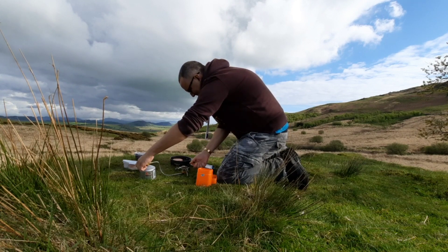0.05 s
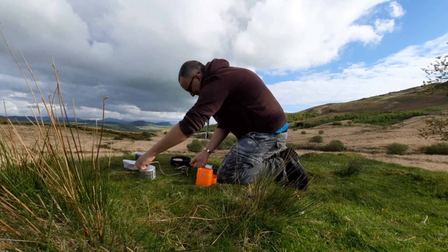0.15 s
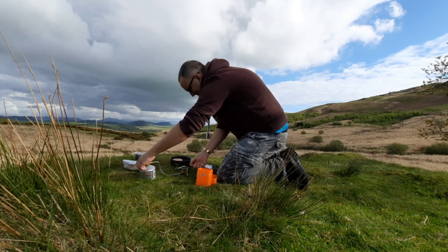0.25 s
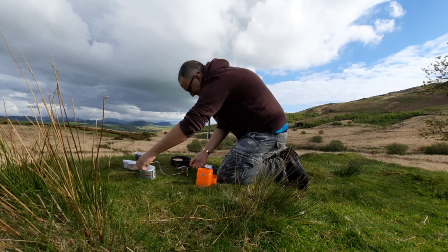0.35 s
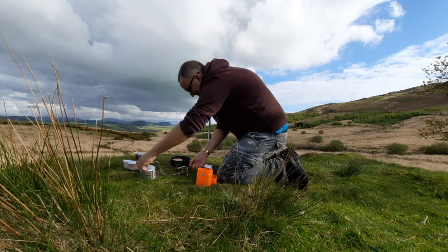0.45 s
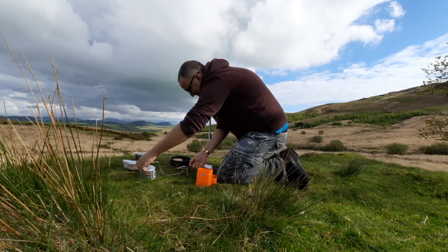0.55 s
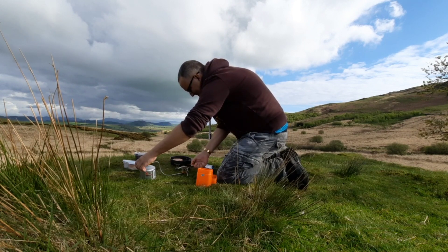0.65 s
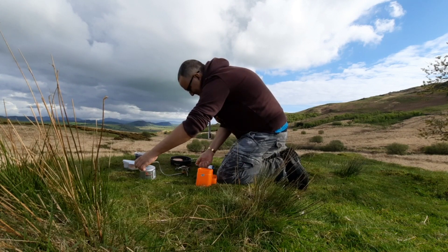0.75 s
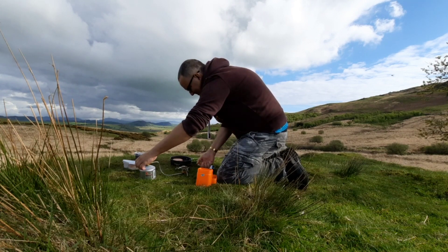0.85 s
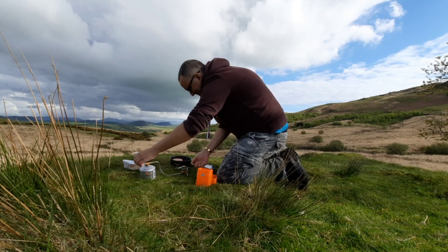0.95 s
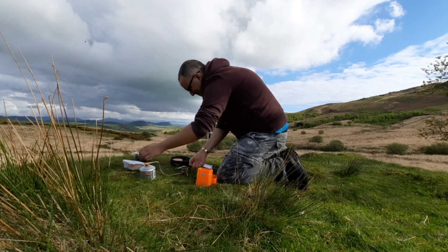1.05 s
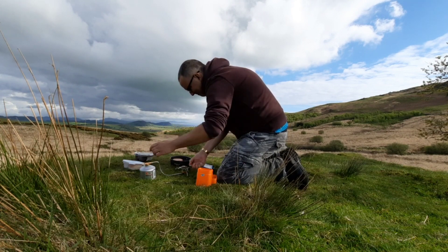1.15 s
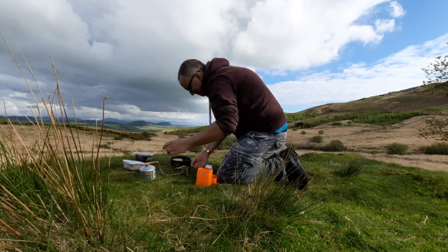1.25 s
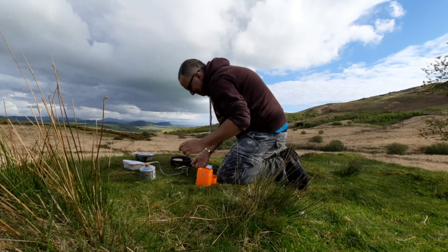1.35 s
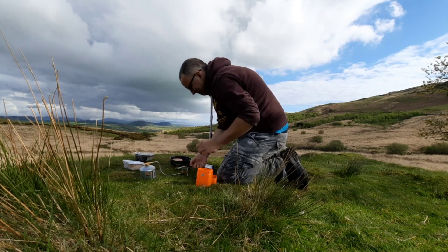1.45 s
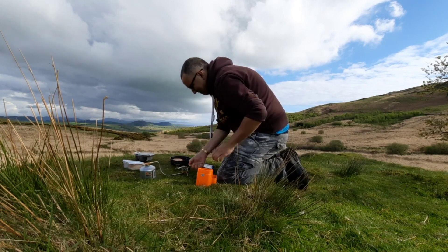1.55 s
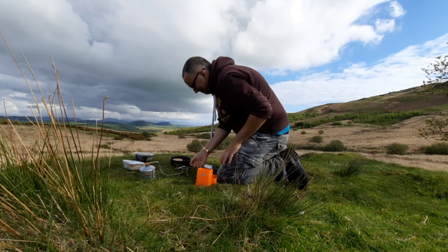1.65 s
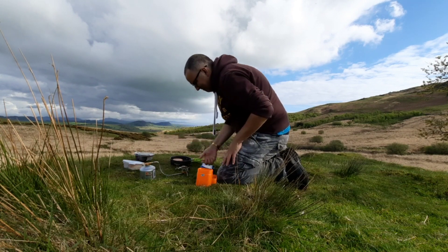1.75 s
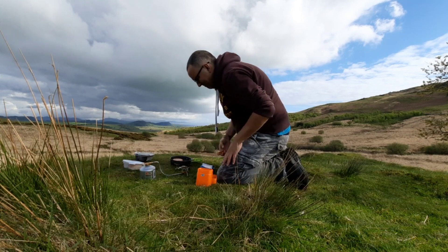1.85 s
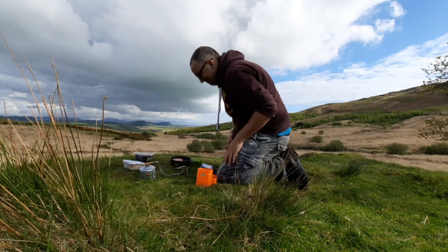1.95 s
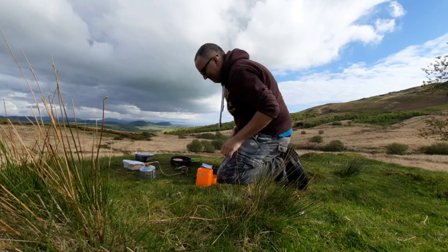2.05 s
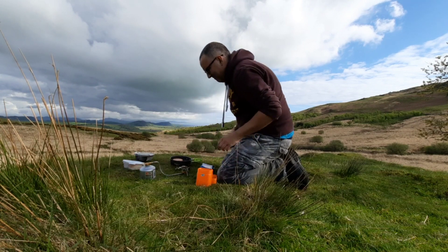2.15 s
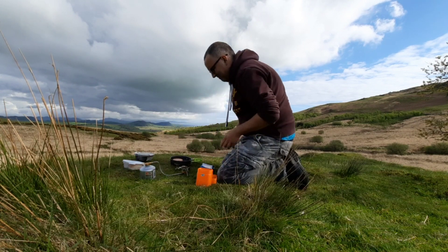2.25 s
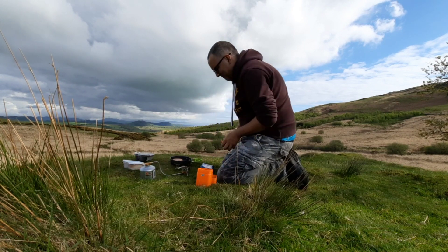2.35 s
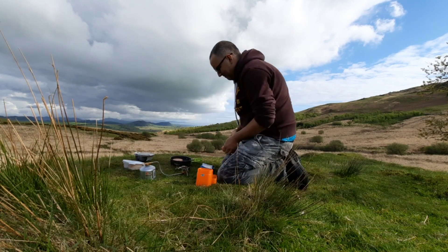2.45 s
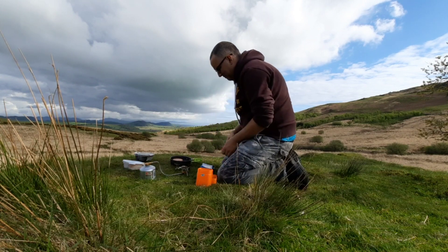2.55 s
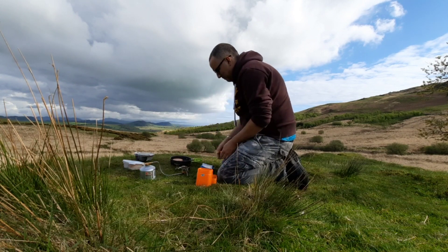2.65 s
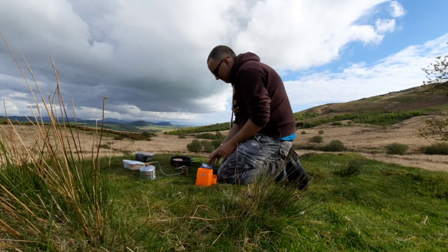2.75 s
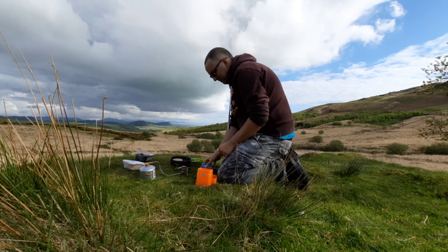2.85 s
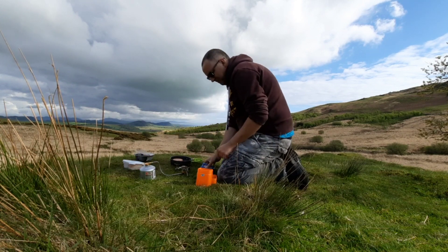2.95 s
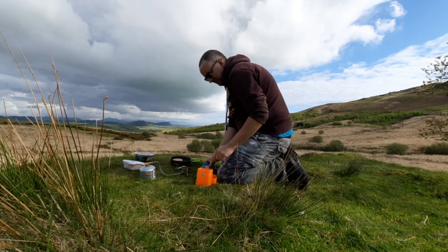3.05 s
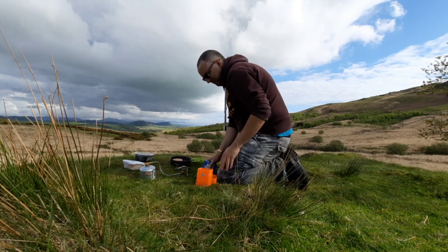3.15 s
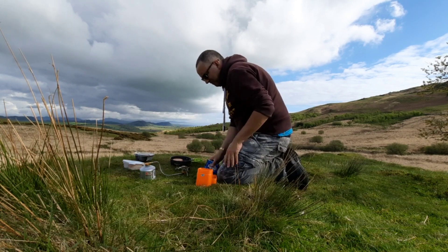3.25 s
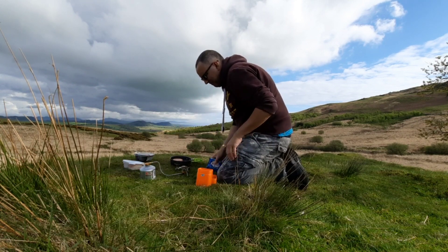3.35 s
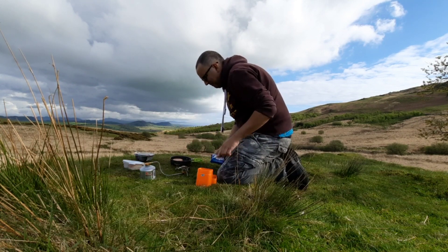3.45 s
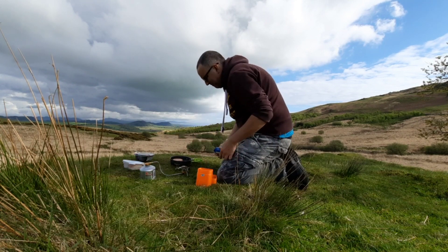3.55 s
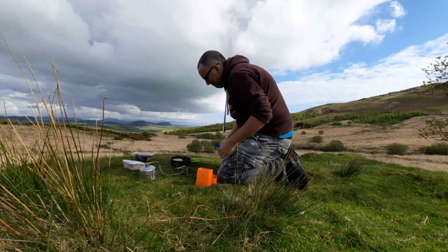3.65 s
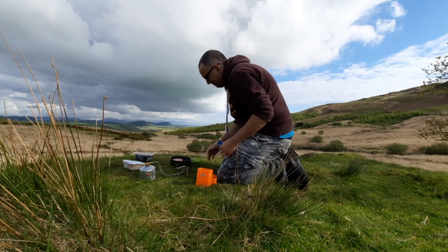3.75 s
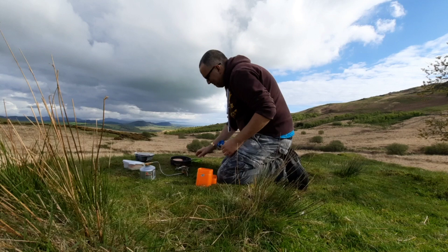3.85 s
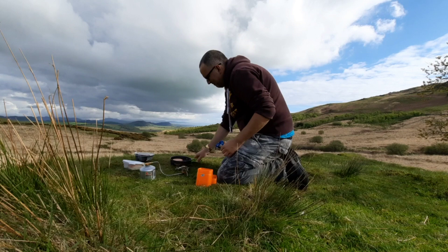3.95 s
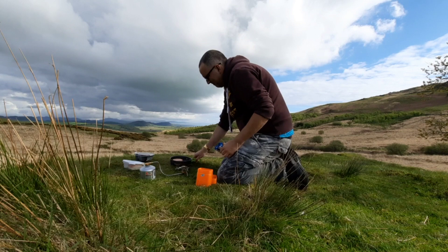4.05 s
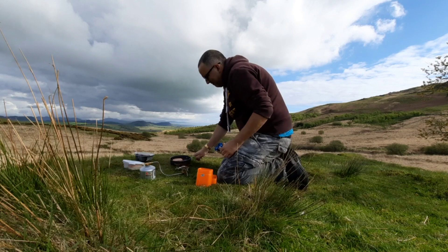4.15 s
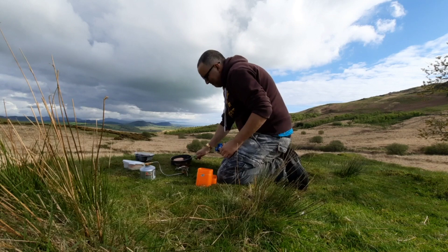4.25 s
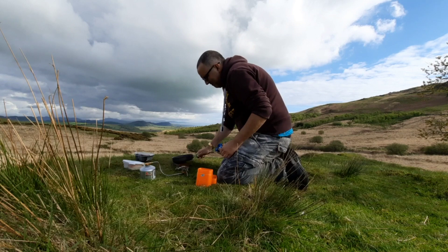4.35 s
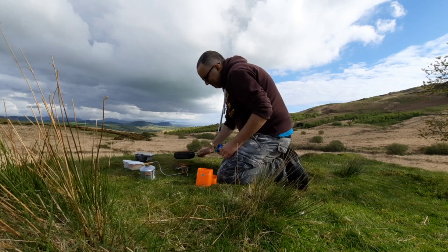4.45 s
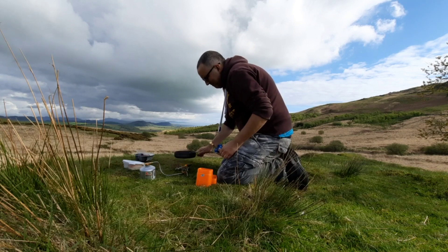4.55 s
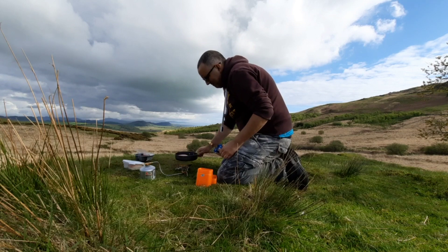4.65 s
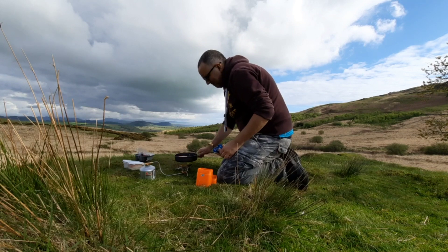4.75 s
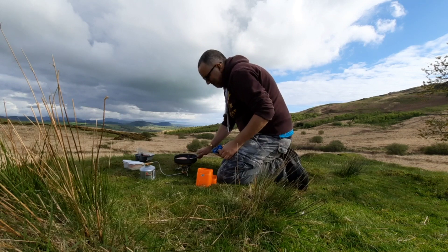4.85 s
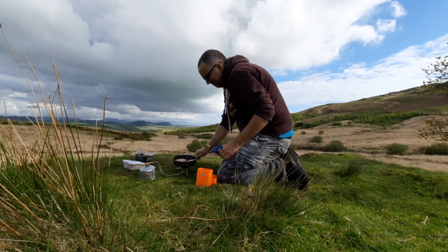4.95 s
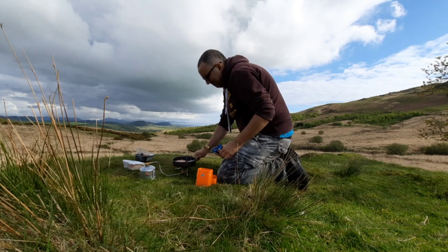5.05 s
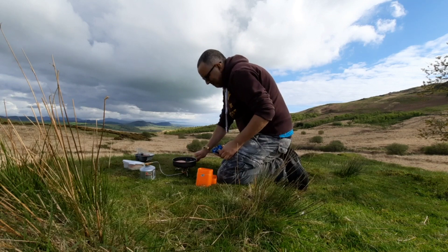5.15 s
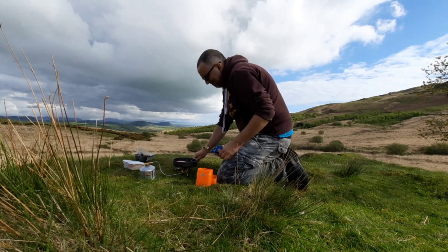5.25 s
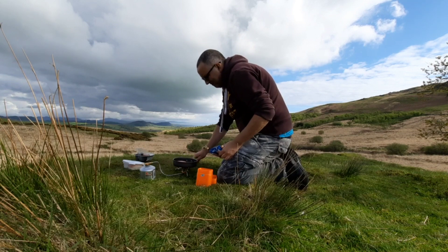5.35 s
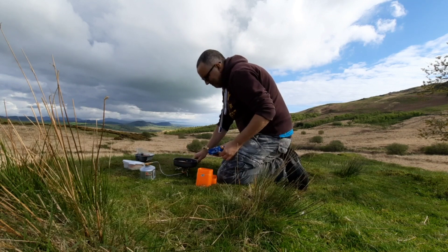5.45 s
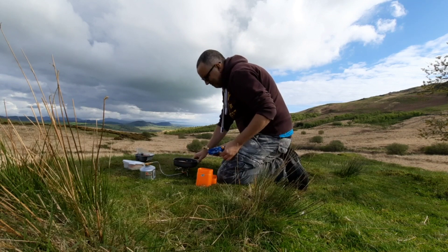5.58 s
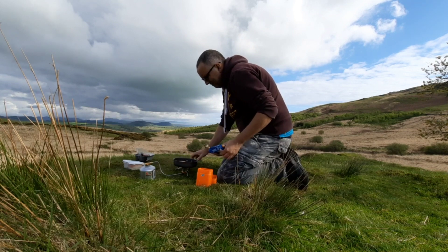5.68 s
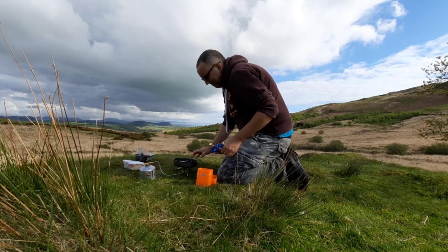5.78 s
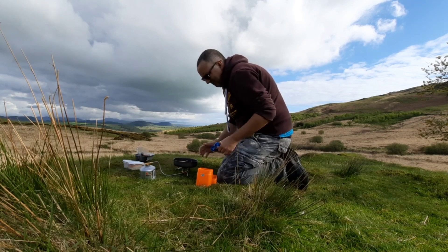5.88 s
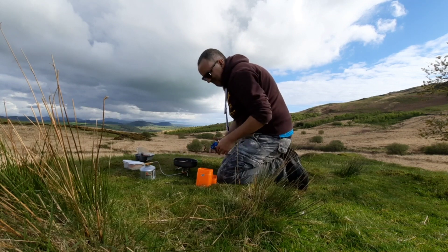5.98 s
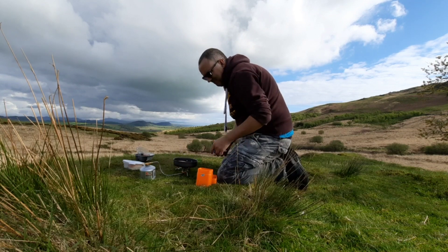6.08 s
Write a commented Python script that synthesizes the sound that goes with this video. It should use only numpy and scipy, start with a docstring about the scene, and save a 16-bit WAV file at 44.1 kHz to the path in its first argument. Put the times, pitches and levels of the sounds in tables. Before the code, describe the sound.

Faint hissing gas, three cracking clicks, a soft fluttering burner roar takes hold, with ticks, fabric rustle and light metal clatter on open grass.

```python
"""A camping gas stove on open grass, to the left of a small camera with two microphone ports, in a light wind.
First gas hisses from the jet (noise in broad resonances) amid swells of rustling, mostly hands, and ticks, knocks.
The igniter snaps three times (short ringing cracks). Just after the third snap the flame catches and roars low,
made of fluttering bands of noise, while hiss and handling go on and the pan clatters (struck modes). Low rumble
(wind, later probably the flame too) is at both ports; the right hears the stove a little later and shaded."""
import sys
import numpy as np
from scipy import signal
from scipy.fft import rfft, irfft, next_fast_len
from scipy.io import wavfile
from scipy.ndimage import uniform_filter1d, map_coordinates

SR = 44100
rng = np.random.default_rng(int(sys.argv[2]) if len(sys.argv) > 2 else 0)


def volts_from_db(level):
    """Convert decibel levels to linear amplitude ratios."""
    exponent = np.asarray(level, float) / 20
    return 10 ** exponent


def materialize(psi):
    """Save the field psi as 16-bit PCM at rate SR to the path in sys.argv[1].

    A 1-D psi becomes a single channel; in a 2-D psi each row is a channel.
    """
    bounded = np.clip(np.atleast_2d(psi).T, -1, 1)
    quanta = np.round(bounded * 32767).astype(np.int16)
    wavfile.write(sys.argv[1], SR, quanta)


N = 269877  # length in samples


def unit(x):
    """Scale so that the mean of the channels has rms 1."""
    return x / np.sqrt(np.mean(np.atleast_2d(x).mean(0) ** 2) + 1e-20)


def along(points, hz):
    """Read a curve of (hz, value) points on a logarithmic pitch axis."""
    point_hz, value = np.transpose(points)
    return np.interp(np.log(hz + 1), np.log(point_hz + 1), value)


def curves(rows):
    """One value per sample for each column after the time."""
    time_s, *columns = np.transpose(rows)
    return [np.interp(np.arange(N) / SR, time_s, column) for column in columns]


def wobble(rate):
    """A smooth random curve through 'rate' random points a second."""
    knots = rng.standard_normal(int(N * rate / SR) + 4)
    return map_coordinates(knots, [np.arange(N) * rate / SR])


def filtered(x, response):
    """Filter x by a response given as a function of frequency."""
    m = next_fast_len(N + SR // 4)
    spectrum = rfft(x, m) * response(np.fft.rfftfreq(m, 1 / SR))
    return irfft(spectrum, m)[..., :N]


def peaks(table):
    """Filter of several resonances (centre_hz, width_hz, level_db) whose powers add."""
    return lambda f: np.sqrt(sum(volts_from_db(2 * db) / (1 + (2 * (f - c) / w) ** 2) ** 2 for c, w, db in table))


def colour(points):
    """Filter that follows (hz, level_db) points."""
    return lambda f: volts_from_db(along(points, f))


def ports(x):
    """The left port hears x[0] as it is; the right hears x[1] later and shaded."""
    # shading of the right port: hz [Hz], level_db [dB]
    shade = [(100, -1), (700, -3.5), (2300, -4.5), (4000, -13.5), (5200, -7), (6600, -2.5), (8500, -5),
             (11000, -10), (13500, -9), (15500, -3.5)]
    lag_s = .000083
    right = lambda f: volts_from_db(along(shade, f)) * np.exp(-2j * np.pi * f * lag_s)
    return np.array([x[0], filtered(x[1], right)])


def rush(gain, apart, patchy_db):
    """Patchy noise from the stove's side; 'apart' sets how much extra noise the right port has."""
    z = signal.stft(rng.standard_normal((2, N)), nperseg=512)[2]
    # random louder and softer patches, smoothed over pitch and then over time
    field = uniform_filter1d(rng.standard_normal(z.shape[1:]), size=5, axis=0)
    field = uniform_filter1d(field, size=10, axis=1)
    patchy = z * volts_from_db(patchy_db * field / field.std())
    shared, extra = signal.istft(patchy, nperseg=512)[1][:, :N]
    return unit(ports(filtered(np.array([shared, shared + apart * extra]), gain)))


def outdoors():
    """Low rumble swells differently at each port; the far murmur of the air is nearly the same at both."""
    # low rumble at the ports, wind and, after lighting, probably the flame too: time_s [s], level_db [dB]
    rumble_levels = [(0.0, -78), (0.27, -62), (0.32, -65.5), (0.83, -73.5), (0.92, -53.5), (1.02, -72),
                     (1.12, -56.5), (1.58, -74), (1.7, -49), (1.89, -63), (3.19, -46), (3.24, -66),
                     (3.37, -51), (4.67, -51), (4.69, -41), (4.98, -59), (5.01, -39), (5.28, -65),
                     (5.59, -51), (5.74, -71), (6.1, -42.5), (6.12, -56)]
    # tone of the low rumble: hz [Hz], level_db [dB, relative]
    buffet = [(13, -23), (22, -15), (36, -12), (54, -2), (67, 1), (140, -7), (180, -26), (310, -120)]
    # tone of the far murmur: hz [Hz], level_db [dB, relative]
    distant = [(88, -42), (150, -19), (252, -17), (340, -4.5), (459, -11), (515, -13), (750, -17),
               (1500, -31), (1950, -74), (3300, -120)]
    lumps = volts_from_db(3.9 * np.array([wobble(48), wobble(5.7)]) + 4.2 * wobble(9))
    rumble = unit(lumps * filtered(rng.standard_normal((2, N)), colour(buffet)))
    rumble = rumble * volts_from_db([[-1.2], [1.2]])  # left a little down, right a little up
    air_db = -70 + 1.5 * wobble(4)
    shared, left, right = filtered(rng.standard_normal((3, N)), colour(distant))
    air = unit(np.array([shared + 0.64 * left, shared + 0.53 * right]))
    return volts_from_db(curves(rumble_levels)[0]) * rumble + volts_from_db(air_db) * air


def strokes():
    """Loudness of rustle and crackle: each stroke swells and fades; a faint stir rustles on."""
    # swells of rustling noise, mostly hands; the one at 1.943 s is probably the flame's breath:
    # start_s [s], length_s [s], level_db [dB], crackle_db [dB over the rustle]
    swells = [(-.2, 1.7, -75.5, -20), (.62, 0.19, -91, -15), (1.086, 0.16, -68, -15),
              (1.587, 0.11, -69, -15), (1.943, 0.52, -64, -20), (2.86, 0.19, -64.5, -4),
              (2.985, 0.49, -65.5, -1.5), (3.602, 0.21, -66, 5), (4.014, 0.23, -73, -14),
              (4.672, 0.17, -62.5, -22), (4.973, 0.27, -64, -5)]
    stir_db = -83.5
    start_s, length_s, level_db, crackle_db = np.transpose(swells)[:, :, None]
    progress = np.clip((np.arange(N) / SR - start_s) / length_s, 0, 1)
    swell = np.sin(np.pi * progress) ** .6
    soft = volts_from_db(stir_db) + np.sum(volts_from_db(level_db) * swell, axis=0)
    crisp = np.sum(volts_from_db(level_db + crackle_db) * swell, axis=0)
    return soft, crisp


def crackle():
    """Sparse random crackles, as of creasing fabric: short noise bursts, mostly small with a few large ones."""
    when, size = rng.random((2, N))
    spikes = (when < 140 / SR) * (size + 0.0091) ** -.55  # about 140 a second
    decay = volts_from_db(-60 * np.arange(SR // 100) / SR / 0.0064)  # falls 60 dB in 6.4 ms
    bursts = np.convolve(spikes, decay)[:N] * rng.standard_normal(N)
    bursts = filtered(bursts, lambda f: 1 / (1 + (1800 / (f + 1)) ** 4) / (1 + f / 9000))
    return unit(ports([bursts, bursts]))


def rustle():
    """Swells of rustling noise, mostly from fabric under the hands: a soft rush with crackles."""
    # tone of the rustle: hz [Hz], level_db [dB, relative]
    rustle_tone = [(1300, -13.5), (1700, -3.5), (2000, -4.5), (2500, 0.5), (3300, -0.5), (4200, -5.5),
                   (6000, -4), (14000, -9)]
    soft, crisp = strokes()
    rushing = volts_from_db(1.8 * wobble(30)) * rush(colour(rustle_tone), apart=0.44, patchy_db=1.0)
    return soft * rushing + crisp * crackle()


def blows(rows, modes, scrape_db):
    """Each blow rings the slightly rough modes near its centre pitch, over a short scrape."""
    out, t = np.zeros(N + SR), np.arange(SR // 10) / SR
    mode_hz, mode_db, t60_s = np.transpose(modes)[:, :, None]
    draws = rng.standard_normal((len(rows), len(modes) + 1, len(t)))
    for (start_s, level_db, centre_hz, reach), (noise, *drift) in zip(rows, draws):
        # modes far from the centre, in octaves, ring less
        nearness = np.exp(-.5 * (np.log2(mode_hz / centre_hz) / reach) ** 2)
        share = volts_from_db(mode_db + 2 * noise[-len(modes):, None]) * nearness
        share = share / np.linalg.norm(share)
        phase = 2 * np.pi * mode_hz * t + .09 * np.cumsum(drift, axis=1)  # drift roughens the pitch
        ring = np.sum(share * volts_from_db(-60 * t / t60_s) * np.sin(phase), axis=0)
        band_hz = centre_hz * 2 ** np.clip([-reach, reach], -1.5, 1.5)
        dull = signal.butter(2, band_hz, "band", fs=SR, output="sos")
        scrape = 1.1 * volts_from_db(-60 * t / .05) * signal.sosfilt(dull, noise)
        scrape = scrape + 0.18 * volts_from_db(-60 * t / 0.0052) * noise  # brief bright start
        onset = 1 - np.exp(-t / 0.00096)
        blow = onset * (volts_from_db(scrape_db) * scrape + 0.51 * ring)
        out[round(start_s * SR):][:len(t)] += volts_from_db(level_db) * blow
    return out[:N]


def handling():
    """Ticks are noise bursts of a few ms; kit and pan ring when struck; bumps are short low tones."""
    # crisp ticks of fabric and kit: start_s [s], level_db [dB], middle_db [dB, middle range over bright]
    ticks = [(1.7363, -43, -12), (2.4168, -42, -11), (2.7196, -40, -17), (2.949, -43, 0), (3.0427, -46, -4),
             (3.0906, -43.5, 0), (3.1277, -41, -1.5), (3.1552, -43, -6), (3.1154, -53, 6),
             (3.141, -48.5, 3), (3.1633, -48, 6), (3.1733, -47, 5), (3.2215, -51, 4), (3.326, -53, -4),
             (3.3414, -53, 4), (3.6292, -46, -4), (3.6457, -47, 2), (3.662, -44.5, 3), (3.676, -51.5, -1),
             (3.7253, -48, 9.5), (3.7456, -48.5, 10), (3.7563, -42, 5), (3.7738, -52, -12),
             (4.0646, -39, -13), (4.34, -45, -9), (4.9884, -32.5, -9.5), (5.084, -40.5, -2),
             (6.0466, -34.5, -7), (6.0585, -44, 0)]
    # soft low bumps: start_s [s], level_db [dB], pitch_hz [Hz], length_s [s]
    bumps = [(0.28, -45, 111, 0.014), (0.881, -44.5, 61.5, 0.073), (1.099, -31, 150, 0.032),
             (1.134, -41, 149, 0.024), (1.161, -45, 133, 0.0095), (1.213, -47, 79, 0.032),
             (4.675, -21.5, 135, 0.022)]
    # dull knocks of the kit: start_s [s], level_db [dB], centre_hz [Hz], reach [octaves that ring]
    knocks = [(.851, -57, 2000, 0.37), (1.095, -39.5, 1820, 1.8), (1.105, -42, 2400, 1),
              (1.114, -42, 1390, 1.2), (1.179, -52, 2100, 0.56), (2.885, -33.5, 2200, 1.5),
              (3.203, -31.5, 2230, 0.47), (3.68, -39.5, 2100, 0.21), (4.032, -43, 2030, 0.31),
              (4.682, -31.5, 2060, 1.6), (4.691, -36, 3380, .4), (5.418, -33, 1490, 0.52),
              (6.046, -34, 2100, .2), (6.062, -41, 2320, 0.28), (6.077, -40, 2240, .3),
              (6.1, -42, 2280, 0.34)]
    # ringing modes of the kit: pitch_hz [Hz], level_db [dB, relative], t60_s [s to fall 60 dB]
    kit_modes = [(734, 0, 0.077), (1192, 4.5, 0.1), (1566, 3, 0.048), (2081, -5, .1), (2370, -5.5, 0.088),
                 (3150, 5.5, 0.051), (3750, 5, .07)]
    # clatter of the pan: start_s [s], level_db [dB]
    clatter = [(3.705, -36), (3.726, -38), (3.746, -45), (3.757, -37), (4.754, -42), (4.987, -26),
               (5.009, -41), (5.037, -33.5), (5.072, -33.5), (5.082, -34), (5.102, -40), (5.139, -41)]
    # ringing modes of the thin pan: pitch_hz [Hz], level_db [dB, relative], t60_s [s to fall 60 dB]
    pan_modes = [(1714, 3, 0.045), (1920, -11, 0.1), (2400, -1, 0.031), (2550, 0, 0.05), (3150, -7, .05)]
    pan_centre_hz, pan_reach_octaves = 2100, 0.54
    high, middle, body = np.zeros((3, N + SR))
    t = np.arange(SR // 10) / SR
    for (start_s, level_db, middle_db), noise in zip(ticks, rng.standard_normal((len(ticks), len(t)))):
        burst = np.tanh(8.1 * noise) * volts_from_db(level_db - 60 * t / 0.0071)
        high[round(start_s * SR):][:len(t)] += burst
        middle[round(start_s * SR):][:len(t)] += burst * volts_from_db(middle_db)
    for start_s, level_db, pitch_hz, length_s in bumps:
        arch = np.sin(np.pi * np.clip(t / length_s, 0, 1))
        body[round(start_s * SR):][:len(t)] += volts_from_db(level_db) * arch * np.sin(2 * np.pi * pitch_hz * t)
    bright_tone = lambda f: 2.3 / (1 + (9000 / (f + 1)) ** 8)
    middle_tone = lambda f: 4.84 / (1 + (1800 / (f + 1)) ** 4) / (1 + (f / 9000) ** 8)
    kit = blows(knocks, kit_modes, scrape_db=0)
    pan_rows = [(start_s, level_db, pan_centre_hz, pan_reach_octaves) for start_s, level_db in clatter]
    pan = blows(pan_rows, pan_modes, scrape_db=-4)
    return filtered(high[:N], bright_tone) + filtered(middle[:N], middle_tone) + body[:N] + kit + pan


def igniter():
    """Each snap is a sharp crack with the brief ring of the housing, and nothing in the bass."""
    # snaps: start_s [s], level_db [dB], bright_db [dB per octave]
    snaps = [(0.6533, -5, -0.5), (1.1615, -2, 0.1), (1.597, -2, 3.5)]
    # ringing of the housing: pitch_hz [Hz], level_db [dB, relative], t60_s [s to fall 60 dB]
    housing = [(1950, -19, .006), (2400, -13, .008), (3050, -19, .009), (5400, -8, .008), (5950, -9, .006),
               (6200, -26, .04), (7100, -6, .0035), (8100, -8, .003), (9200, -6, .004), (9300, -28, .04),
               (10200, -8, .003), (12200, -3, .005), (13500, -5, .003), (15200, -2, .004),
               (16000, -5, .003)]
    # hollow between the snap's low and high body: hz [Hz], level_db [dB]
    hollow = [(3200, 0), (3500, -9), (4300, -9), (4900, 0)]
    out, t = np.zeros(N + SR), np.arange(SR // 20) / SR
    draws = rng.standard_normal((len(snaps), 2 * len(housing) + len(t)))
    for (start_s, level_db, bright_db), draw in zip(snaps, draws):
        late = np.clip(t - (start_s * SR % 1) / SR, 0, None)  # seconds since the snap, between samples
        ring = np.zeros(len(t))
        for (pitch_hz, mode_db, t60_s), vary_db, turn in zip(housing, draw, draw[len(housing):]):
            tilt_db = bright_db * np.log2(pitch_hz / 5000)
            fading = volts_from_db(mode_db + tilt_db + vary_db - 60 * late / t60_s)
            ring += fading * np.cos(2 * np.pi * pitch_hz * (late - .00025) + .5 * turn)
        ring *= -np.expm1(-(late / .0002) ** 3)  # very fast onset
        rattle = volts_from_db(-24 - 60 * t / .025) * np.diff(draw[-len(t) - 1:])
        snap = rattle - ring
        out[int(start_s * SR):][:len(t)] += volts_from_db(level_db) * snap / abs(snap).max()
    no_bass = signal.butter(6, 1650, "high", fs=SR, output="sos")
    return filtered(signal.sosfilt(no_bass, out[:N]), colour(hollow))


def whistle():
    """The jet's whistle: noise in one resonance that slides with time."""
    # whistle: time_s [s], level_db [dB], centre_hz [Hz]
    sliding = [(0.0, -67, 9140), (0.51, -62, 9330), (0.87, -67.5, 9200), (1.58, -67.5, 9260),
               (1.89, -61.5, 9700), (2.06, -59, 9300), (2.28, -64, 9640), (2.64, -66, 9650),
               (2.72, -62, 10400), (2.79, -64, 10000), (2.96, -67.5, 9570), (5.11, -64.5, 9820),
               (5.5, -59.5, 9640), (6.12, -61.5, 9670)]
    level_db, centre_hz = curves(sliding)
    hz, t, z = signal.stft(rng.standard_normal((2, N)), SR, nperseg=512)
    centre = np.interp(t, np.arange(N) / SR, centre_hz)
    shape = 1 / (1 + ((hz[:, None] - centre) / 420) ** 2)
    shared, extra = signal.istft(z * shape, SR, nperseg=512)[1][:, :N]
    return volts_from_db(level_db + 2.2 * wobble(16)) * unit(ports([shared, shared + 0.33 * extra]))


def jet():
    """Gas through the nozzle hisses in broad resonances, in three ranges and a whistle."""
    # loudness of the hiss: time_s [s], jet_db [dB], thin_top_db [dB]
    hiss_levels = [(0.0, -70, -64), (0.43, -70.5, -63.5), (1.26, -71, -62.5), (1.55, -71.5, -63.5),
                   (1.77, -64.5, -66.5), (2.16, -66, -62), (2.84, -63.5, -67.5), (3.13, -63.5, -65),
                   (3.39, -65, -63.5), (3.75, -65, -64.5), (4.1, -65.5, -65), (4.65, -65, -63.5),
                   (5.05, -65, -76.5), (5.79, -64, -66), (6.12, -62, -66)]
    # loudness of the low range: time_s [s], level_db [dB]
    low_levels = [(0, -70), (.43, -69.5), (1.26, -67.5), (1.64, -67), (2.16, -68), (3.2, -66), (3.8, -68),
                  (4.81, -67.5), (5.79, -72.5), (6.12, -68)]
    # resonances of the main, low and top ranges: centre_hz [Hz], width_hz [Hz], level_db [dB, relative]
    main_peaks = [(6140, 390, 3), (6720, 600, 5.5), (7260, 1080, 2.5), (8400, 2100, -8.5)]
    low_peaks = [(4080, 1050, -5.5), (4835, 800, 2.5), (5680, 900, -1.5)]
    top_peaks = [(11120, 1600, -5), (12660, 2300, -6), (13700, 1400, -29), (14800, 1100, -13.5),
                 (15200, 420, -7.5)]
    jet_db, top_db = curves(hiss_levels)
    low_db = curves(low_levels)[0]
    hiss = volts_from_db(jet_db + 1.02 * wobble(8)) * rush(peaks(main_peaks), apart=0.76, patchy_db=2.5)
    low = volts_from_db(low_db + 0.47 * wobble(7.6)) * rush(peaks(low_peaks), apart=0.86, patchy_db=1.6)
    top = volts_from_db(top_db + .8 * wobble(5)) * rush(peaks(top_peaks), apart=0.66, patchy_db=1.0)
    return hiss + low + top + whistle()


def flame():
    """Turbulent burning: noise in four ranges that puff and sway together, with a low resonant roar."""
    # loudness of the flame: time_s [s], roar_db [dB], breathy_edge_db [dB]
    flame_levels = [(1.63, -39.5, -59), (1.68, -33, -60), (1.74, -44, -64.5), (1.79, -37.5, -68),
                    (1.94, -46, -68), (2.04, -36.5, -56.5), (2.12, -35.5, -51), (2.17, -37.5, -52.5),
                    (2.22, -37.5, -55.5), (2.35, -33.5, -56.5), (2.4, -38, -56.5), (2.52, -36, -67.5),
                    (2.67, -36.5, -63.5), (2.74, -47.5, -74), (2.82, -46, -70.5), (2.89, -39.5, -67),
                    (3.05, -36, -64.5), (3.27, -41.5, -63), (3.32, -35.5, -64), (3.68, -33.5, -60.5),
                    (3.85, -36.5, -65.5), (4.2, -34.5, -64), (4.7, -35, -60), (5.12, -34, -56),
                    (5.6, -34.5, -67), (6.12, -35.5, -62.5)]
    # burner resonances: centre_hz [Hz], width_hz [Hz], level_db [dB, relative]
    roar_peaks = [(261, 174, -3.5), (296.6, 70, 3.5), (315, 20, -2)]
    # tones of the upper range, the flutter and the breathy edge: hz [Hz], level_db [dB, relative]
    upper_tone = [(220, -27), (380, -1), (532, 1), (767, -11), (1200, -25), (1560, -58), (2640, -120)]
    flutter_tone = [(32, -35), (55, -9.5), (151, 3), (230, -2), (300, -21), (510, -120)]
    edge_tone = [(800, -2), (1050, 0.5), (1350, -1.5), (1600, -8), (1900, -7), (2500, -8), (3300, -26.5)]
    roar_db, edge_db = curves(flame_levels)
    roar_swing = roar_db - np.median(roar_db)
    edge_swing = edge_db - np.median(edge_db)
    # the upper range and the flutter follow a share of these swings
    upper_db = -43 + 0.38 * edge_swing + 0.21 * roar_swing
    flutter_db = -41 + 0.3 * roar_swing
    catch = np.clip((np.arange(N) / SR - 1.612) / 0.034, 0, 1)  # silent until the flame catches
    puffs, sway = wobble(28), wobble(11)
    roar_db = roar_db + 0.1 * puffs + 1.12 * sway
    upper_db = upper_db + 0.85 * puffs + 1.3 * wobble(60) + 0.43 * sway
    flutter_db = flutter_db + 0.81 * puffs + 0.54 * sway + 2.37 * wobble(10)
    edge_db = edge_db + 2.0 * puffs + 0.78 * sway + 1.44 * wobble(12)
    roar = volts_from_db(roar_db) * rush(peaks(roar_peaks), apart=0.26, patchy_db=0.45)
    upper = volts_from_db(upper_db) * rush(colour(upper_tone), apart=0.36, patchy_db=1.3)
    flutter = volts_from_db(flutter_db) * rush(colour(flutter_tone), apart=0.34, patchy_db=0.5)
    edge = volts_from_db(edge_db) * rush(colour(edge_tone), apart=0.63, patchy_db=2.8)
    return catch * (roar + upper + flutter + edge)


def scene():
    """Stove and hands reach the ports from the left, amid low rumble and the open air."""
    # the camera's treble limit, applied to everything but snaps, flame and outdoors: hz [Hz], level_db [dB]
    treble_limit = [(15820, 0), (15950, -24), (16600, -30), (17100, -70)]
    snaps, handled = igniter(), handling()
    near = ports([handled, handled]) + jet() + rustle()
    sparks = volts_from_db([[-.6], [.6]]) * ports([snaps, snaps])
    return sparks + filtered(near, colour(treble_limit)) + flame() + outdoors()


def top_cut(x):
    """Nothing passes above the cut-off."""
    return signal.sosfilt(signal.butter(12, 17120, fs=SR, output="sos"), x)


def record(dry):
    """The camera's band limit cuts the highest treble."""
    band_limit = [(16200, 0), (16600, -14), (17100, -50)]  # hz [Hz], level_db [dB]
    mix = filtered(dry, colour(band_limit))
    return top_cut(mix)


dry = scene()
out = record(dry)
materialize(out)
```